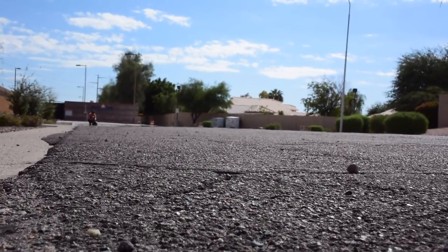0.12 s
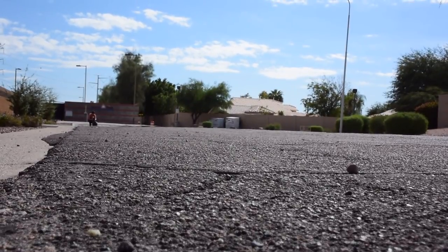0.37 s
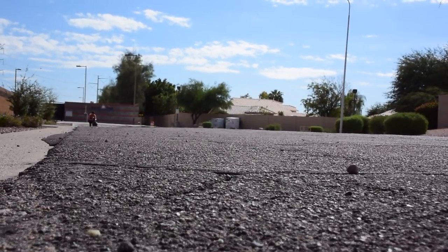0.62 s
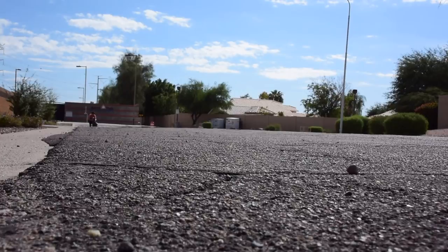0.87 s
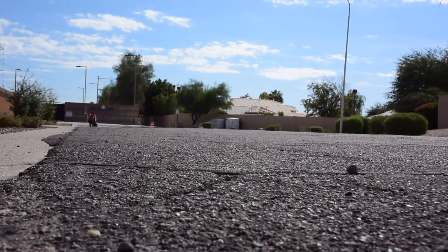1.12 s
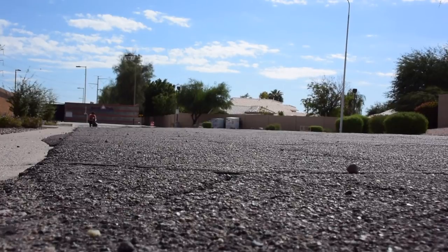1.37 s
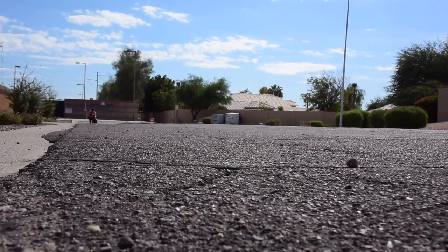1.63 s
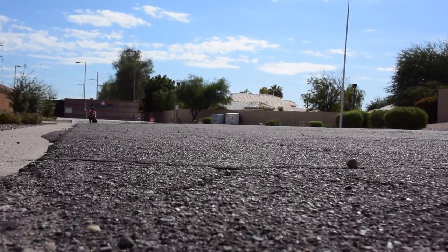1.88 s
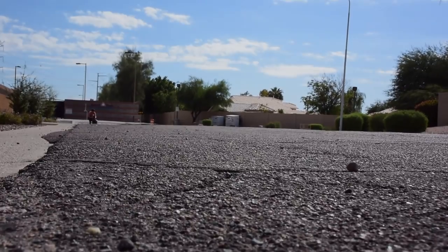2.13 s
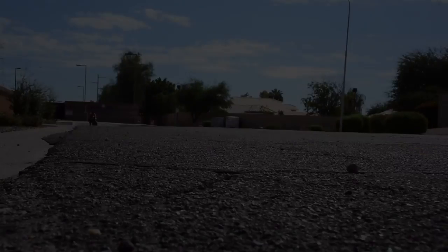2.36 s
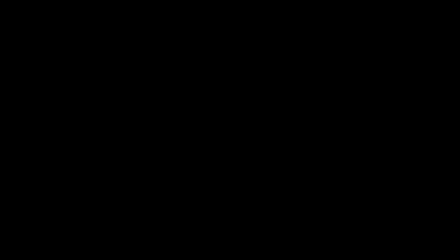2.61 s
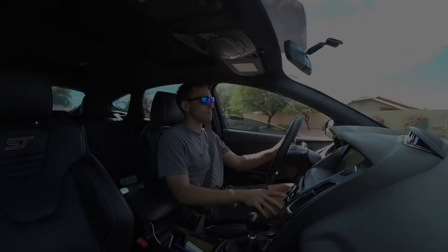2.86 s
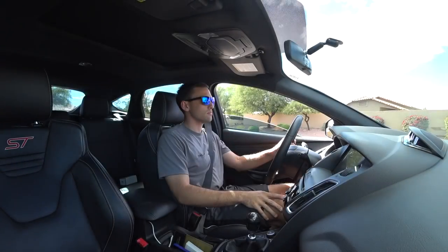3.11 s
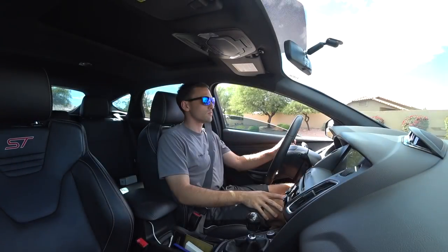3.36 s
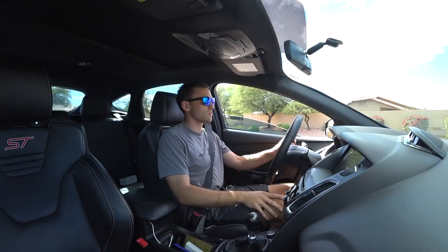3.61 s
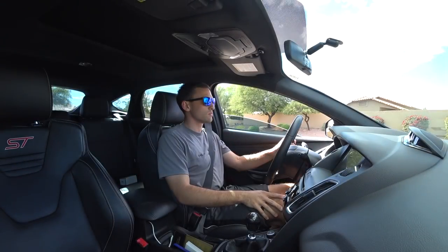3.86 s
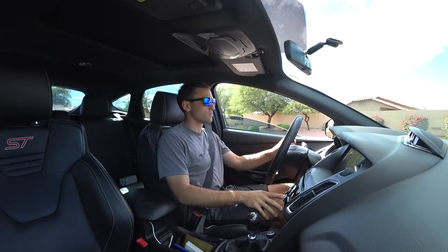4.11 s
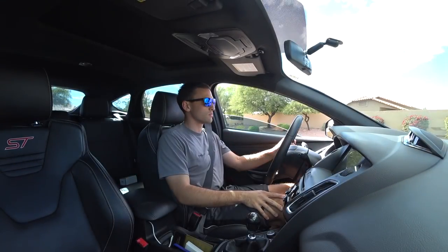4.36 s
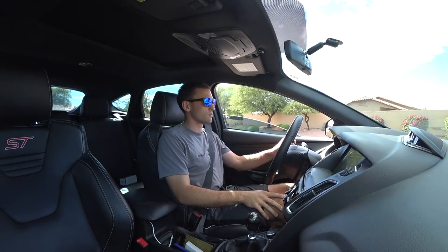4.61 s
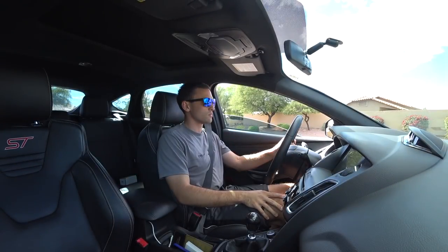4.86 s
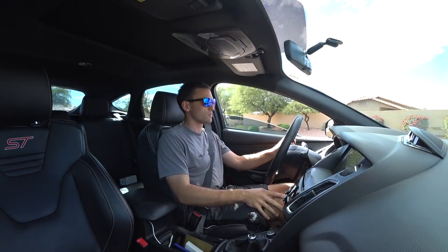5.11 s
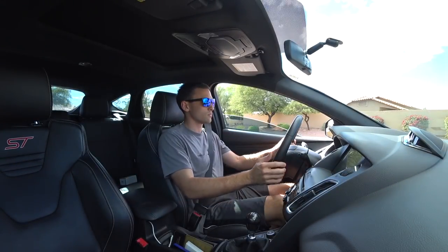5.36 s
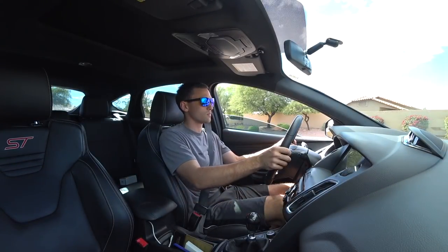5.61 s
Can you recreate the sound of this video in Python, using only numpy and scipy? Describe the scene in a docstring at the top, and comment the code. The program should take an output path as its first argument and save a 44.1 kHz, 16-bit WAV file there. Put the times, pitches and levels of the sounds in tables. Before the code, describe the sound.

Outdoors, close to a low microphone that distorts, a four-cylinder turbo car accelerates loudly, lifts, changes to a lower pitch, pulls again and recedes over tyre roar with a few exhaust pops. A crossfade leads inside a parked car: quiet low idle, one swelling throttle blip, then revs sinking slowly amid soft hiss and small rustles.

```python
"""A four-cylinder turbo car pulls away down a street, changes gear and recedes, near a low microphone that overloads.
Its exhaust is clean tones locked to the crank plus one ragged pulse per firing, with echoes, tyre roar and pops.
The street fades into the cabin of a parked car: idle, one blip of the throttle and the slow fall of the revs.
There the engine tones boom through the cabin modes, over rumble, murmur, hiss and a faint electrical whine.
Short grainy bursts of noise make two ticks on the street, then small movements in the cabin."""
import sys
import numpy as np
from scipy import signal
from scipy.fft import rfft, irfft, next_fast_len
from scipy.io import wavfile
from scipy.ndimage import uniform_filter1d

SR = 44100
rng = np.random.default_rng(int(sys.argv[2]) if len(sys.argv) > 2 else 0)


def volts(x):
    """Linear amplitude factor 10**(x/20) for a level x in dB, scalar or array-like."""
    e = np.asarray(x, float) / 20
    return 10 ** e


def log_audio(samples):
    """Write samples as a 16-bit WAV file to the path given in sys.argv[1]."""
    # one column per channel
    frames = np.atleast_2d(samples).T
    # limit to full scale, then quantise
    limited = np.clip(frames, -1, 1)
    pcm = np.round(limited * 32767).astype(np.int16)
    wavfile.write(sys.argv[1], SR, pcm)


N = 252672  # length in samples


def evened(x):
    """Scales a sound to rms 1."""
    return x / np.sqrt(np.mean(x ** 2) + 1e-20)


def read(points, hz):
    """Reads a table of (pitch_hz, value) between its points, on a log frequency axis."""
    f, value = np.transpose(points)
    return np.interp(np.log(hz + 1), np.log(f + 1), value)


def columns(rows):
    """Draws each column of a table as a curve with a value at every sample."""
    s, *values = np.transpose(rows)
    return [np.interp(np.arange(N) / SR, s, v) for v in values]


def slow(hz, count):
    """Rows of smooth random drift, rms 1, moving up to about hz times a second."""
    knots_per_s = 100
    knots = rng.standard_normal((count, int(N / SR * knots_per_s) + 9))
    smooth = signal.lfilter(*signal.butter(2, hz / (knots_per_s / 2)), knots)
    at = np.arange(N) / SR * knots_per_s
    return np.array([np.interp(at, np.arange(len(v)), evened(v)) for v in smooth])


def noise(spectrum, same, lead, patchy_db):
    """Two channels of coloured noise, partly alike, with patches in time and pitch that are louder or softer."""
    frames, hz = N // 256 + 5, np.fft.rfftfreq(1024, 1 / SR)
    a, b, c, d, patches = rng.standard_normal((frames, 513, 5)).T
    patches = uniform_filter1d(patches, size=10, axis=0)  # across pitch
    patches = evened(uniform_filter1d(patches, size=12, axis=1))  # across time
    like = np.clip(read(same, hz), -1, 1)[:, None]
    left = a + 1j * b
    right = like * left + np.sqrt(1 - like ** 2) * (c + 1j * d)
    right = right * np.exp(-1j * read(lead, hz))[:, None]
    z = np.array([left, right]) * volts(read(spectrum, hz)[:, None] + patchy_db * patches)
    return evened(signal.istft(z, nperseg=1024, noverlap=768)[1][:, :N])


def ports(x, tilt, lead):
    """Level and phase differences between the two microphone ports, half given to each side."""
    size = next_fast_len(N + SR // 4)
    hz = np.fft.rfftfreq(size, 1 / SR)
    half = volts(read(tilt, hz) / 2) * np.exp(.5j * read(lead, hz))
    # a mirrored, faded tail keeps the end from leaking into the start
    held = np.pad(x, [(0, 0), (0, size - N)], "reflect")
    held = held * np.minimum(1, np.linspace(size / 4000, 0, size))
    return irfft(rfft(held) * np.array([half, 1 / half]), size)[:, :N]


def colour(x, spectrum):
    """Filters a sound to the given dB spectrum, with nothing heard ahead of its cause."""
    hz = abs(np.fft.fftfreq(8192, 1 / SR))
    log_gain = np.log(volts(np.maximum(read(spectrum, hz), -100)))
    taps = np.fft.ifft(np.exp(np.conj(signal.hilbert(log_gain)))).real[:4096]
    return signal.oaconvolve(x, taps)[:N]


# electrical whine: steady tones (pitch_hz, level_db)
WHINE_TONES = [(9049, -91), (9109, -91), (9232, -89), (9292, -88), (9351, -91), (9830, -91), (9889, -80),
               (9948, -81), (10008, -90)]


def electrical_whine():
    """Faint steady high tones, each a pure sine starting at a random point of its cycle."""
    t = np.arange(N) / SR
    return sum(np.sqrt(2) * volts(db) * np.sin(2 * np.pi * (hz * t + rng.random())) for hz, db in WHINE_TONES)


# colour of the cabin hiss (pitch_hz, level_db per Hz)
HISS_COLOUR = [(1200, -28.5), (2000, -8.5), (3000, -1.5), (4500, -4), (6000, -5.5), (7800, -10.5),
               (8300, -6), (9500, -8.5), (10900, -8), (11150, -42), (12000, -84)]
# how alike left and right are for every noise in the cabin (pitch_hz, likeness 0 to 1)
CABIN_LIKENESS = [(60, 0.42), (140, 0.23), (310, 0.6), (700, 0.01), (1580, 0.05), (3570, 0.11)]


def cabin_hiss():
    """Steady hiss of the cabin: coloured noise with slightly uneven patches."""
    return volts(-63.5) * noise(HISS_COLOUR, CABIN_LIKENESS, [(0, 0)], patchy_db=0.5)


# colour of the engine bay murmur (pitch_hz, level_db per Hz)
MURMUR_COLOUR = [(250, -40), (420, 5.5), (440, -23.5), (471, -5), (544, -9), (629, -16), (867, -21.5),
                 (950, -17), (1490, -26), (1670, -28), (2600, -35.5), (3380, -60.5), (5720, -120)]


def engine_bay_murmur(firing_hz):
    """Soft noise from the engine bay that grows with the revs."""
    idle_db, db_per_octave = -48.5, 3.5
    level_db = idle_db + db_per_octave * np.log2(firing_hz / firing_hz[0])
    return volts(level_db) * noise(MURMUR_COLOUR, CABIN_LIKENESS, [(0, 0)], patchy_db=0.0)


def shell_rumble(firing_hz):
    """Low noise of the shaking shell, which shakes harder above a certain firing rate."""
    calm_db, harder_from_hz, db_per_octave = -31, 64, 18
    level_db = calm_db + db_per_octave * np.maximum(np.log2(firing_hz / harder_from_hz), 0)
    shake = rng.standard_normal((2, N))
    shake[1] = shake[0] + 0.2 * shake[1]  # right is nearly the same as left
    band = signal.butter(2, [14, 45], "bandpass", fs=SR, output="sos")
    return volts(level_db) * evened(signal.sosfilt(band, shake))


# ticks and rustles: two ticks on the street, then small movements in the cabin
# (start_s, length_s, level_db before the swell, low_hz, high_hz, left_over_right_db)
TICKS_AND_RUSTLES = [(1.807, 0.0068, -52, 2970, 7593, -5), (2.005, 0.0065, -54, 4000, 9250, -16),
                     (2.756, 0.045, -58, 2520, 7840, 3), (3.408, 0.021, -48.5, 705, 2940, 3),
                     (3.412, .012, -56, 3000, 8550, 4), (3.689, 0.12, -67.5, 7600, 10160, 1.5),
                     (3.784, 0.0045, -59, 890, 4470, -9), (3.807, .005, -54.5, 910, 4500, -8),
                     (3.86, 0.0064, -55, 900, 4000, 3), (4.726, 0.022, -69, 494, 1994, 10),
                     (5.15, .05, -65, 6080, 10460, 1), (5.208, 0.051, -64, 4530, 7050, 3),
                     (5.457, 0.12, -58.5, 4457, 8504, 0), (5.513, 0.15, -58, 2207, 8000, 1),
                     (5.525, 0.025, -61, 2400, 3600, 0.5), (5.627, .012, -60, 3024, 6930, 1)]


def ticks_and_rustles():
    """Short bursts of band-limited noise; random steps in level make them grainy."""
    out = np.zeros((2, N))
    t = np.arange(8000) / SR
    for s, length, db, low_hz, high_hz, pan_db in TICKS_AND_RUSTLES:
        grains_db = 2.5 * np.repeat(rng.standard_normal(80), 100)
        raw = rng.standard_normal((2, 8000)) * volts(grains_db)
        band = signal.butter(5, [low_hz, high_hz], "bandpass", fs=SR, output="sos")
        rise, fall = t / (0.081 * length), (length - t) / (0.49 * length)
        swell = np.clip(np.minimum(rise, fall), 0, 1) ** 2
        sides = volts(db + np.array([[pan_db], [-pan_db]]) / 2)
        burst = sides * evened(signal.sosfilt(band, raw)) * swell
        part = out[:, round(s * SR):][:, :8000]
        part += burst[:, :part.shape[1]]
    return out


# levels on the street over time (time_s, tyre_roar_db, intake_and_turbo_hiss_db)
ROAD_LEVELS = [(0.0, -25, -38.5), (0.42, -26, -38.5), (0.56, -31.5, -42.5), (0.62, -32.5, -50),
               (0.74, -26.5, -44.5), (0.9, -28, -43), (1.05, -27, -45), (1.24, -24, -36), (1.5, -29, -43.5),
               (1.6, -32, -47.5), (1.71, -26, -47.5), (2.33, -28, -47.5), (2.6, -25.5, -50.5),
               (2.78, -28, -43.5), (3.15, -30, -81)]
# colour of the tyre roar (pitch_hz, level_db per Hz)
TYRE_COLOUR = [(20, -38.5), (90, -20), (200, 0), (350, -7.5), (500, -10.5), (800, -2), (1210, -2),
               (1500, -10.5), (2000, -20), (3000, -36), (3300, -36.5), (5000, -39), (8000, -44),
               (9300, -54.5), (10200, -89)]
# colour of the intake and turbo hiss (pitch_hz, level_db per Hz)
TURBO_COLOUR = [(1000, -29.5), (1700, -22.5), (2130, -5), (2810, -3), (3000, -5.5), (3290, -17.5),
                (4900, -21), (5300, -28.5), (7800, -36), (9000, -44), (9600, -48.5), (10500, -94)]
# how alike left and right are on the street (pitch_hz, likeness 0 to 1)
STREET_LIKENESS = [(60, 0.58), (140, 0.82), (700, 0.97), (1580, 0.87), (3570, 0.18), (8000, 0.12)]


def tyres_and_turbo():
    """Two coloured noises, tyre roar and intake and turbo hiss, fluttering together."""
    roar_db, hiss_db = columns(ROAD_LEVELS)
    flutter_db = slow(45, count=1)  # 1 dB rms
    roar = noise(TYRE_COLOUR, STREET_LIKENESS, [(0, 0.0064)], patchy_db=1.5)
    hiss = noise(TURBO_COLOUR, STREET_LIKENESS, [(0, 0.01)], patchy_db=1.5)
    return volts(roar_db + flutter_db) * roar + volts(hiss_db + 0.82 * flutter_db) * hiss


# overrun pops of the exhaust (time_s, level_db, pitch_hz)
OVERRUN_POPS = [(2.076, -20, 1162), (2.449, -7.5, 920), (2.555, -8, 940), (2.62, -16.5, 1170)]


def overrun_pops():
    """Each pop is a very short burst of a tone and a faint ring of the pipe."""
    width_s, ring_s, ring_rise_s, ring_db = .0007, 0.007, 0.0059, -12
    out, t = np.zeros(N), np.arange(-300, 2000) / SR
    after = np.maximum(t, 0)
    burst = np.exp(-(t / width_s) ** 2 / 2)
    ring = volts(ring_db) * np.exp(-after / ring_s) * (1 - np.exp(-(after / ring_rise_s) ** 2))
    shape = (burst + ring) * np.hanning(len(t) + 2000)[2000:]  # fades to silence at the end
    for s, db, hz in OVERRUN_POPS:
        out[round(s * SR) - 260:][:len(t)] += volts(db) * shape * np.cos(2 * np.pi * hz * t)
    return out


# cabin modes: pitches at which the air in the cabin rings (pitch_hz, width_hz, level_db)
CABIN_MODES = [(40, 16, -3.5), (132, 7.27, 13.5), (193, 8, 4.5), (226, 25.4, -4), (279, 55.3, -3.5),
               (320.5, 17.6, -1), (375, 14.2, -10), (495, 28, -15.5), (555.5, 26, -15.5)]


def cabin_modes(hz):
    """Strength and phase of the ringing cabin air at a pitch; neighbouring modes have opposite signs."""
    return sum((-1) ** k * volts(db) / (1 + 2j * (hz - f) / w) for k, (f, w, db) in enumerate(CABIN_MODES))


# jolts of the engine on its mounts (start_s, level_db)
MOUNT_JOLTS = [(3.993, -4), (4.165, -19), (5.22, -25), (5.324, -12.5)]


def mount_jolts(response):
    """Short soft pushes of the engine on its mounts that ring the cabin modes."""
    pushes = np.zeros(N)
    for s, db in MOUNT_JOLTS:
        pushes[round(s * SR):][:300] = volts(db) * np.hanning(300) / 150
    return irfft(rfft(pushes) * response, N) / abs(irfft(response, N)).max()


# weaker multiples of the firing rate (multiple, level_db before the cabin modes)
WEAK_MULTIPLES = [(.5, -2), (1.5, -23.5), (2.5, -12.5), (3.5, -6.5), (4, 0.5), (4.5, -12), (6, -6.5),
                  (7, -6.5), (8, -4.5), (10, -13), (12, -11.5)]


def wavering_overtones(turns, hz):
    """Multiples of the firing rate, each wavering by itself, swell as they sweep through the cabin modes."""
    waver = volts(4.5 * slow(6, count=len(WEAK_MULTIPLES)))
    return sum(volts(db) * cabin_modes(k * hz) * w * np.exp(1j * k * turns)
               for (k, db), w in zip(WEAK_MULTIPLES, waver)).real


# cabin engine: idle, blip with a stumble, slow fall
# (time_s, firing_hz, combustion_load_db, firing_tone_db)
THROTTLE_BLIP = [(2.3, 24.07, -10.5, -23.5), (3.1, 25.53, -16, -18), (3.25, 28.5, -10.5, -22),
                 (3.37, 29.68, -9.5, -13.5), (3.48, 37.93, -0.5, -15.5), (3.58, 47.15, 3, -17.5),
                 (3.63, 50.9, 1.5, -16), (3.67, 55, -4.5, -29.5), (3.72, 61.03, 1.5, -17),
                 (3.79, 69.6, 1, -13.5), (3.88, 78.3, 6.5, -18.5), (3.95, 80.76, 5, -25.5),
                 (4.03, 81.4, 1.5, -26), (4.24, 78.9, -2.5, -22.5), (4.41, 74.35, -0.5, -28),
                 (4.6, 69.06, 0, -25), (4.89, 60.9, -0.5, -19.5), (5.12, 52.77, -2, -29),
                 (5.21, 50.65, -0.5, -23), (5.3, 50.87, -3, -25), (5.4, 48.88, -8, -23),
                 (5.73, 43.74, -6.5, -37)]
# steady multiples of the firing rate
# (multiple, level_db at load 0 before the booming, level_db per dB of load)
STEADY_MULTIPLES = [(2, -24.5, 1.96), (3, -26, 1.29), (5, -30.5, .7)]
# how the cabin passes the steady multiples (pitch_hz, level_db)
CABIN_BOOMING = [(45, -1.5), (95, -1.5), (110, 2.5), (125, 5), (140, 10), (150, 2.5), (161, -9.5),
                 (172, -14), (190, -2), (215, -2.5), (245, -11), (300, -8), (400, -16.5)]


def cabin_engine():
    """Tones locked to the firing rate; uneven combustion, heard as noise, and jolts ring the cabin modes."""
    hz, load_db, first_db = columns(THROTTLE_BLIP)
    turns = 2 * np.pi * np.cumsum(hz) / SR  # phase of the firing tone, radians
    steady = sum(volts(db + share * load_db + read(CABIN_BOOMING, k * hz)) * np.sin(k * turns)
                 for k, db, share in STEADY_MULTIPLES)
    tones = np.sqrt(2) * (volts(first_db) * np.sin(turns) + steady)
    response = cabin_modes(np.fft.rfftfreq(N, 1 / SR))
    flat_noise = noise([(0, 0)], CABIN_LIKENESS, [(0, 0.015)], patchy_db=1.5)
    boom = evened(irfft(rfft(flat_noise) * response, N))
    # levels at load 0, then dB per dB of load
    overtones = volts(-27.5 + 1.34 * load_db) * wavering_overtones(turns, hz)
    boom = volts(-27.5 + 0.92 * load_db) * boom
    return tones + overtones + boom + mount_jolts(response)


# level difference between the two ports in the cabin (pitch_hz, left_over_right_db)
CABIN_PORT_LEVELS = [(28, 4), (60, -0.8), (140, 1.3), (310, -0.5), (700, -1.0), (1580, -0.5), (3570, 0.5)]
# phase difference between the two ports in the cabin (pitch_hz, phase_radians)
CABIN_PORT_PHASES = [(0, 0), (30, -.45), (60, -.8), (130, -1.), (250, -1.), (520, -1.2), (780, -2.),
                     (1030, -.5), (2000, -1.5), (8000, 0)]


def cabin(inside):
    """The parked car's engine and background noises, faded in and reaching both microphone ports."""
    firing_hz = columns(THROTTLE_BLIP)[0]
    background = shell_rumble(firing_hz) + engine_bay_murmur(firing_hz) + cabin_hiss() + electrical_whine()
    return ports(inside * (cabin_engine() + background), CABIN_PORT_LEVELS, CABIN_PORT_PHASES)


# colour of the tailpipe (pitch_hz, level_db)
TAILPIPE = [(41, -26.5), (70, -15.5), (144, -4), (201, -17.5), (268, -3), (362, 4.5), (401, 1), (512, 4.5),
            (735, 0), (2200, -51), (2860, -63.5), (4840, -120)]


def crank_orders(turns_hz, ranks):
    """Clean multiples of the crank rate, shaped by the pipe, each fading as paths add up."""
    turns = np.cumsum(turns_hz) / SR
    fading_db = 4 * slow(6, count=len(ranks))
    drift = .05 * slow(3, count=len(ranks))  # phase wander, in cycles
    return evened(sum(volts(read(TAILPIPE, k * turns_hz) + f) * np.sin(2 * np.pi * (k * turns + d))
                      for k, f, d in zip(ranks, fading_db, drift)))


# a house front behind the car (delay_s, extra delay_s per s, level_db against the clean orders)
HOUSE_FRONT = (0.11, 0.049, -12)


def house_front_echo(turns_hz, orders_db):
    """One late copy of the clean orders; the lengthening path lowers its pitch."""
    delay, slip, wall_db = HOUSE_FRONT
    now = np.arange(N) / SR
    then = now * (1 - slip) - delay  # when the echo heard now left the pipe
    heard_hz = (1 - slip) * np.interp(then, now, turns_hz)
    return volts(wall_db + np.interp(then, now, orders_db)) * crank_orders(heard_hz, (2, 4, 5, 6, 7, 8))


def firing_pulses(turns, turns_hz):
    """One ragged pulse and a rush of gas per firing, coloured by the pipe and echoed by house fronts."""
    at = np.flatnonzero(np.diff(np.floor(2 * turns)))  # two firings per crank turn
    late, size = rng.standard_normal((len(at), 2)).T
    where = at + late * 0.067 * SR / (2 * turns_hz[at])
    pulses = np.zeros(N)
    strong_weak = 1 + .6 * (-1) ** np.arange(len(at))  # strong and weak in turn
    pulses[np.clip(where, 0, N - 1).astype(int)] = strong_weak * volts(2.2 * size)
    rush = rng.standard_normal(N) * np.exp(-(2 * turns % 1) / .3)  # dies down after each firing
    rasp = evened(colour(evened(pulses - pulses.mean()) + .45 * evened(rush), TAILPIPE))
    # sparse random echoes, about 300 a second, falling 60 dB in 0.6 s
    t = np.arange(SR // 2) / SR
    taps = rng.standard_normal((2, len(t))) * (rng.random((2, len(t))) < 300 / SR)
    taps = taps * volts(-60 * t / .6) * (t > .008)
    taps[1] = taps[0] + 0.44 * taps[1]
    echoes = evened(signal.oaconvolve(rasp[None], taps, axes=1)[:, :N])
    return evened(rasp + volts(-3) * echoes)


# street engine: first gear, lift, clutch bites, second gear, lift
# (time_s, crank_hz, exhaust_load_db, firing_tone_db before the brief changes below)
STREET_DRIVE = [(0.0, 93.24, -2, -34.5), (0.3, 97.55, 0, -25.5), (0.5, 100.4, 1, -33.5),
                (0.56, 98.3, -1, -25.5), (0.62, 98.9, -13, -34.5), (0.7, 98.5, -5, -30.5),
                (0.8, 96.37, -7, -31), (0.84, 92.8, 4, -39), (0.92, 89.73, 1, -38), (1.0, 75.7, 3.5, -25.5),
                (1.05, 66.68, 0, -29), (1.14, 69.3, 1, -30), (1.3, 69.25, 1, -21),
                (1.48, 69.56, 0.5, -26.5), (1.58, 71, -3, -36.5), (1.66, 69.73, -9, -37.5),
                (1.95, 68.54, -12.5, -33.5), (2.3, 65.54, -19, -34.5), (2.6, 63.16, -22, -41),
                (3.15, 59.3, -22, -29)]
# brief changes of the two strongest tones, mostly dips
# (centre_s, half_length_s, firing_tone_change_db, octave_change_db)
TONE_CHANGES = [(0.2, 0.1, -21, 2.5), (0.258, 0.087, 3.5, -17.5), (0.493, 0.088, -3, -19),
                (0.693, 0.091, 2, -8), (0.61, 0.034, -17, -5.5), (0.819, 0.028, -14, 0),
                (0.956, 0.019, -1, -17), (1.052, 0.037, 1, -5), (1.2, 0.035, -3.5, -3.5),
                (1.355, 0.055, -2, -8.5), (1.546, 0.051, -15, -30), (2.08, 0.046, -16, 8),
                (2.38, 0.092, -31, 1)]


def exhaust():
    """The firing tone and its octave, the other clean crank orders and the ragged firing pulses."""
    turns_hz, load_db, tone_db = columns(STREET_DRIVE)
    turns = np.cumsum(turns_hz) / SR
    # clean orders weaken while the revs fall fast
    falling = np.maximum(uniform_filter1d(-np.gradient(turns_hz) * SR, size=2000), 0)  # Hz per s
    blur_db = np.maximum(-0.2173 * falling, -16)
    # levels at load 0, then dB per dB of load
    orders_db = -19.5 + 1.09 * load_db + blur_db
    octave_db = -24 + load_db + read(TAILPIPE, 4 * turns_hz)
    for s, half, tone_change_db, octave_change_db in TONE_CHANGES:
        near = np.clip(1 - abs(np.arange(N) / SR - s) / half, 0, 1)
        tone_db = tone_db + tone_change_db * near
        octave_db = octave_db + octave_change_db * near
    tones = volts(tone_db) * np.sin(4 * np.pi * turns) + volts(octave_db) * np.sin(8 * np.pi * turns)
    upper = volts(orders_db) * crank_orders(turns_hz, (3, 5, 6, 7, 8, 9, 10))
    wall = house_front_echo(turns_hz, orders_db)
    return volts(-22.5 + load_db) * firing_pulses(turns, turns_hz) + upper + wall + np.sqrt(2) * tones


# level difference between the two ports on the street (pitch_hz, left_over_right_db)
STREET_PORT_LEVELS = [(60, 0.63), (170, -0.46), (460, -1.8), (1290, 0.22), (3570, -0.69)]


def street():
    """The exhaust thins out in the bass; the microphone clips engine and road, and pops come on top."""
    overload = .52  # largest wave height the microphone passes
    thin = signal.sosfilt(signal.butter(2, 120, "highpass", fs=SR, output="sos"), exhaust())
    heard = ports(thin + tyres_and_turbo(), STREET_PORT_LEVELS, [(0, 0.003)])
    return np.clip(heard, -overload, overload) + overrun_pops()


# the street gives way to the cabin (start_s, end_s, curve of the street's fall as a power)
STREET_TO_CABIN = (2.25, 3.085, 1.24)


def scene():
    """The street fading into the cabin, with ticks and rustles on top."""
    start_s, end_s, curve = STREET_TO_CABIN
    inside = np.clip((np.arange(N) / SR - start_s) / (end_s - start_s), 0, 1)
    return (1 - inside) ** curve * street() + cabin(inside) + ticks_and_rustles()


def top_cut(x):
    """Nothing passes above the cut-off."""
    return signal.sosfilt(signal.butter(12, 15830, fs=SR, output="sos"), x)


def record(dry):
    """Turns the finished mix into the sound that is written out."""
    return top_cut(dry)


dry = scene()
out = record(dry)
log_audio(out)
```